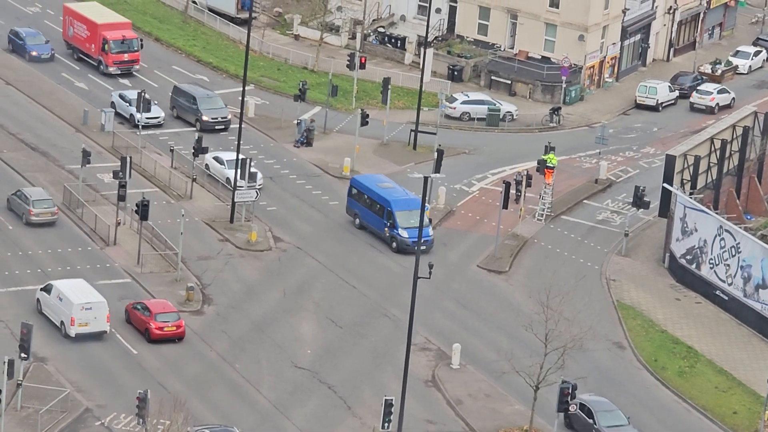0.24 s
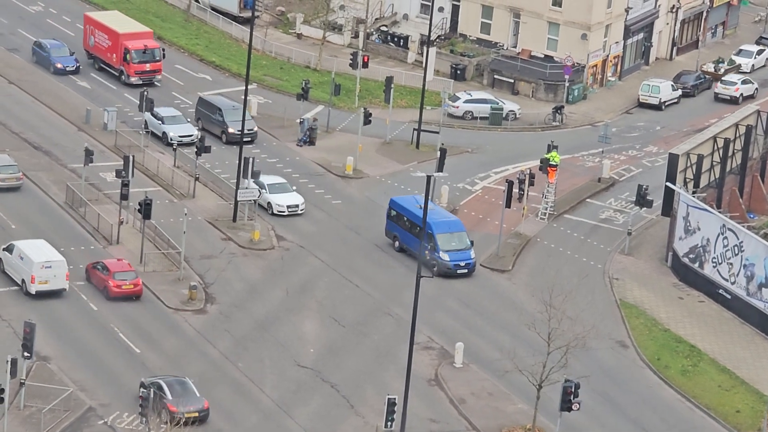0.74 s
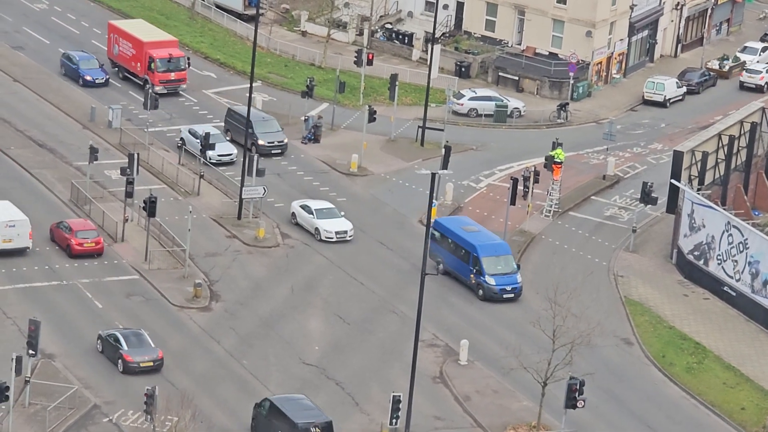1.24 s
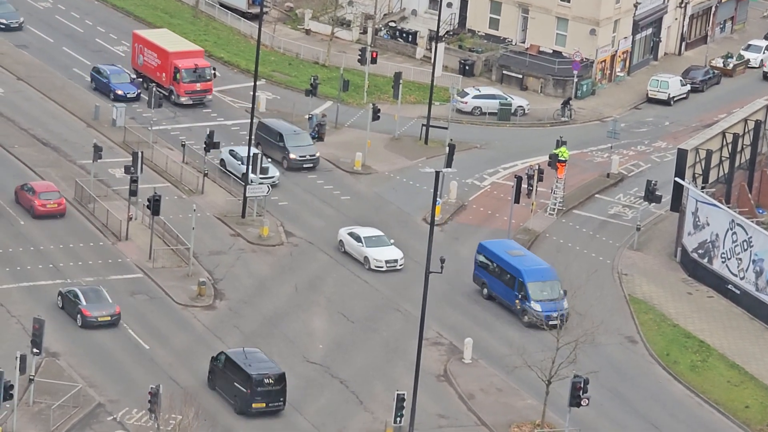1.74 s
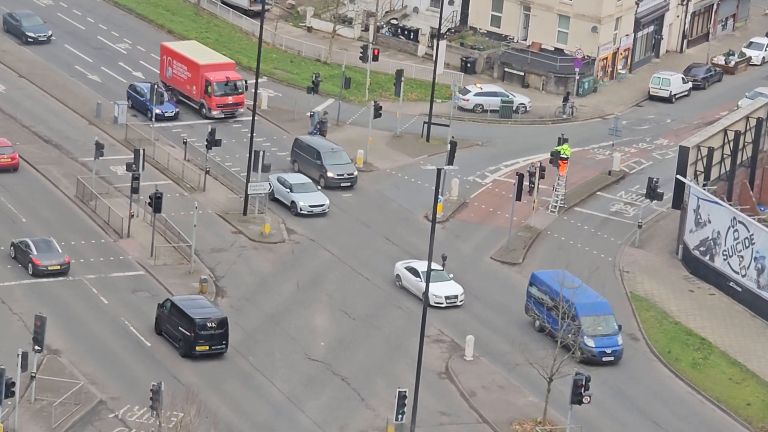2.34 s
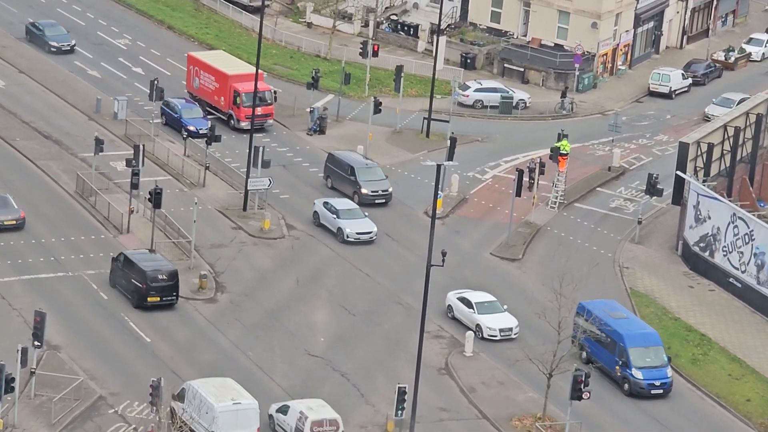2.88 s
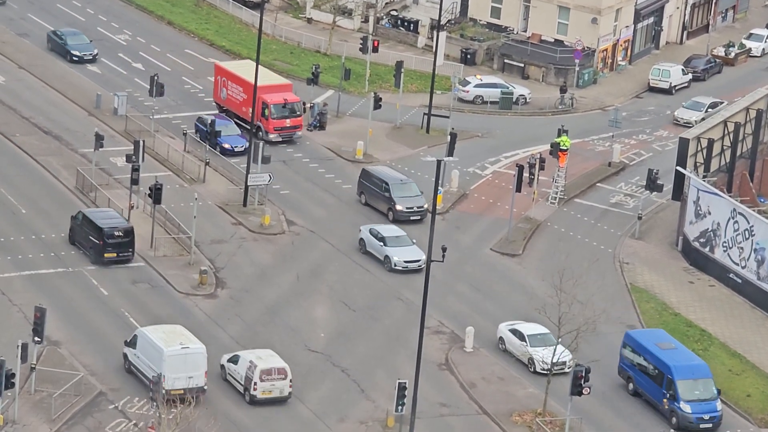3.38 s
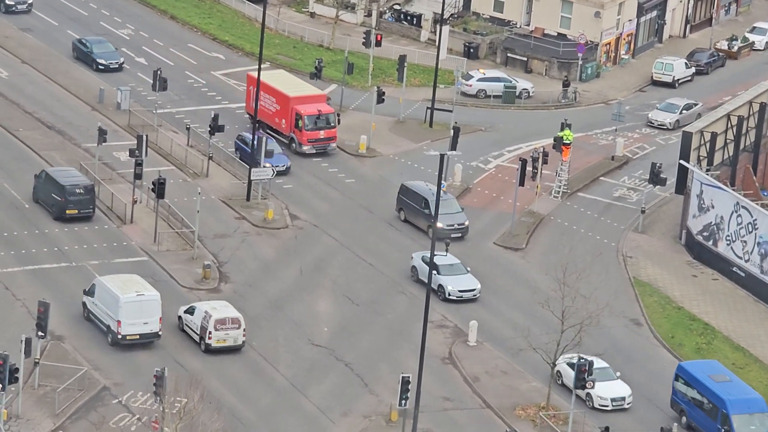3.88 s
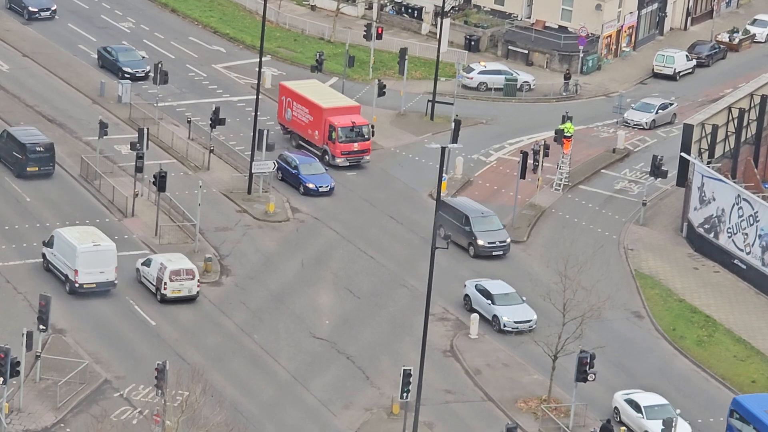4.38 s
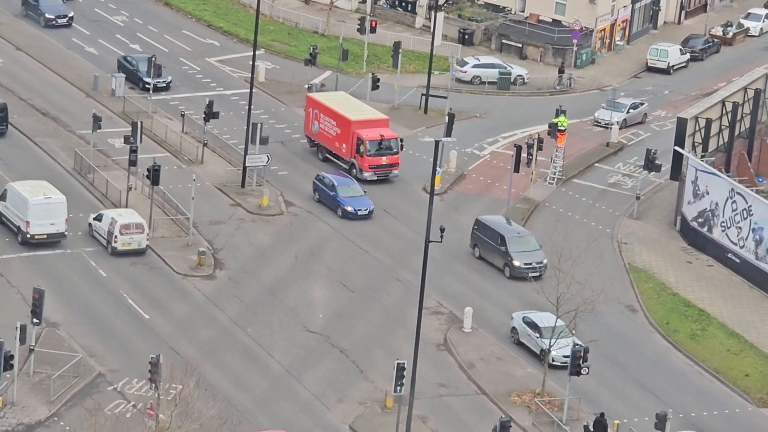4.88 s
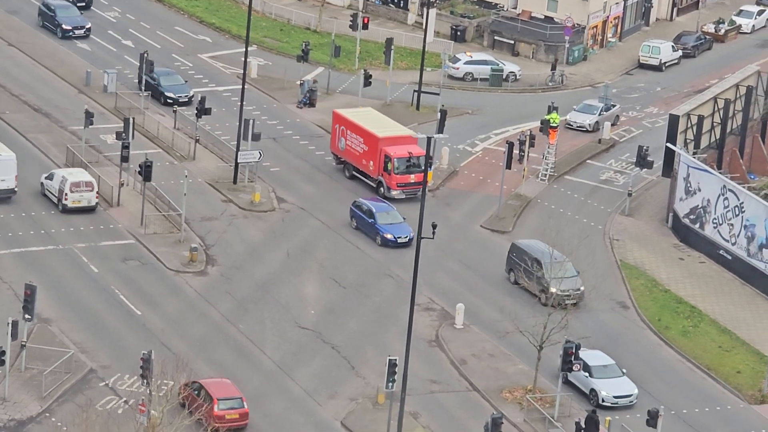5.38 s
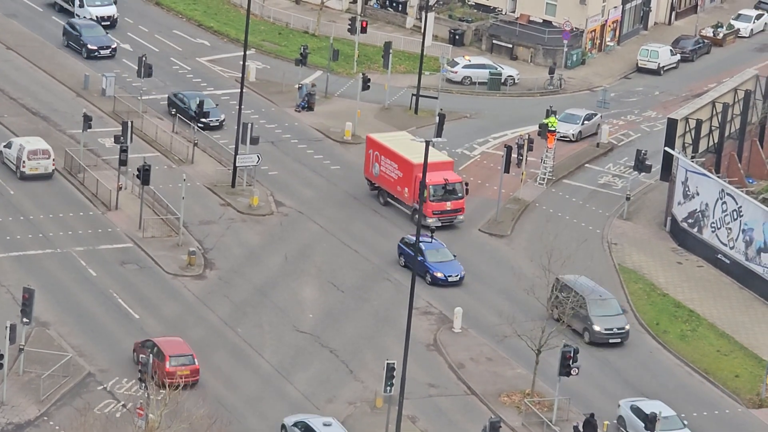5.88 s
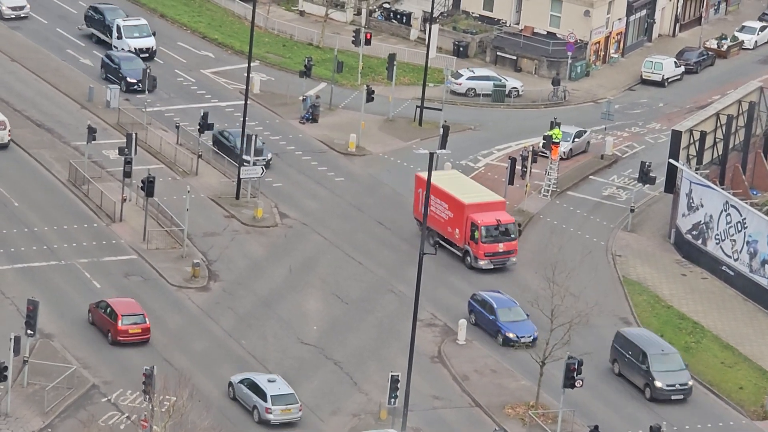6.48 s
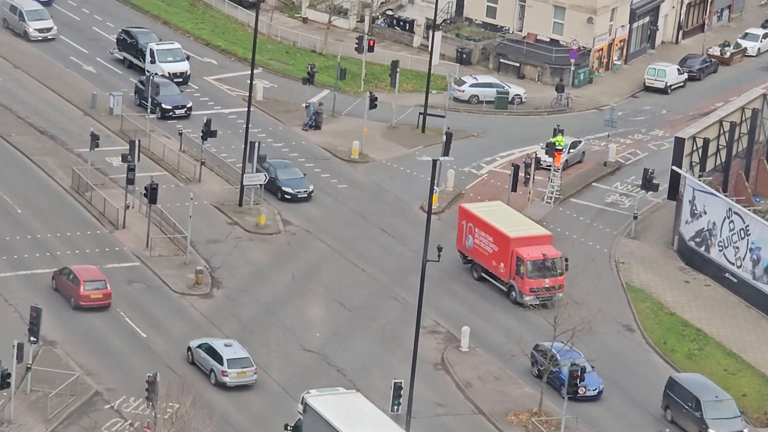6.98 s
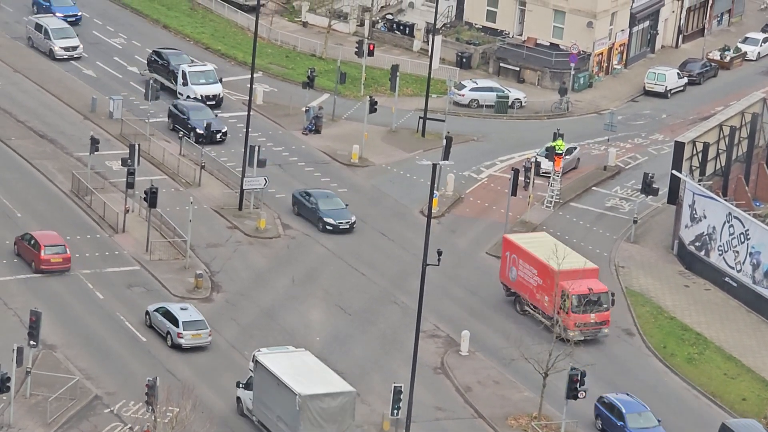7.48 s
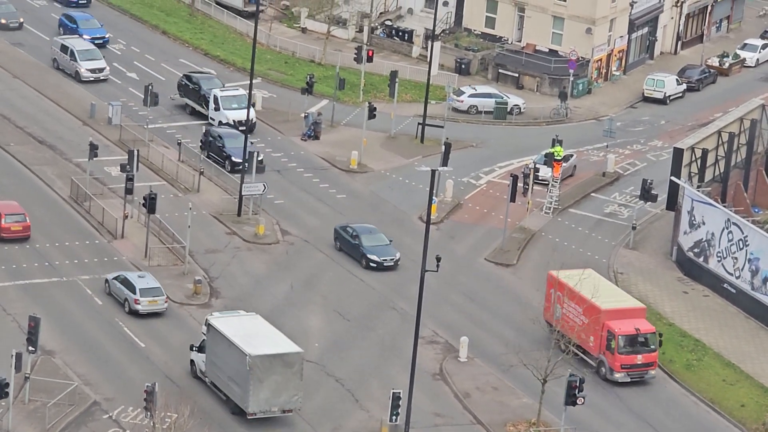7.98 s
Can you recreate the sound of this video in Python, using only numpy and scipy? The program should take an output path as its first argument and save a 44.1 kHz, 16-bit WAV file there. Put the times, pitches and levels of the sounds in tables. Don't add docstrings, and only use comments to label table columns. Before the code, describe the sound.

From the start, a busy junction is heard through a closed window from a high room: deep exhaust rumble, a low drone and muffled tyre roar striped by pane resonances. Short throttle throbs around 50 to 70 Hz come and go, swelling strongest from about 2.8 to 5 s, while fainter engines glide beneath. The roar gradually comes nearer, fullest near 7 s. Light wheel knocks fall at 4.4 and 4.65 s, followed by a barely audible gear squeal. From 5.2 to 6.6 s a lorry pulls away, its low note rising steadily. Sharp dry ticks in the room stand out at 6.4 and 6.6 s, with much fainter ones elsewhere. At 7.4 s wheels hit a drain cover with a hard, booming thump and click; another soft squeal follows. A faint high knock comes at 8.1 s, then a tiny tick. Slight cloth rustles and phone hiss remain very quiet.

```python
import sys
import numpy as np
from scipy import signal
from scipy.fft import rfft, irfft, next_fast_len
from scipy.io import wavfile
from scipy.ndimage import uniform_filter1d

SR = 44100
rng = np.random.default_rng(int(sys.argv[2]) if len(sys.argv) > 2 else 0)


def volts_from_decibels(level):
    exponent = np.asarray(level, float) / 20
    return 10 ** exponent


def generate_wav(sig):
    pcm = np.round(np.clip(np.atleast_2d(sig).T, -1, 1) * 32767).astype(np.int16)
    wavfile.write(sys.argv[1], SR, pcm)


N = 362943
SIZE = next_fast_len(N)
HZ = np.maximum(np.arange(SIZE // 2 + 1) * SR / SIZE, 1)
TIME = np.arange(N) / SR
BRIEF = np.arange(2 ** 15) / SR

# time in seconds, engine load in dB, nearness in dB.
TRAFFIC = [(0, 3.5, -4.5), (.5, -7, -3.5), (.9, 1.5, -2.5), (1.5, -0.5, -1.5), (1.8, 2.5, -1),
           (2.4, -1.5, 0.5), (2.9, 0, -1), (3.35, 2, 0.5), (3.7, 1.5, 2.5), (4.3, 4.5, 0.5), (5.1, -3, 0.5),
           (5.6, 2, 1), (6.2, 2, 1), (6.65, -5.5, 1.5), (7.0, 3, 2), (7.4, 1, 0), (7.9, -1, -1),
           (8.23, 5, 0)]
# frequency in Hz, level in dB per Hz.
RUMBLE_COLOUR = [(11, -40.5), (18, -9.5), (43, 7), (59, 4.5), (75, 5.5), (110, -11.5), (140, -41),
                 (240, -120)]
DRONE_COLOUR = [(59, -34.5), (100, 0), (134, -2), (183, -7.5), (266, -2.5), (283, -3), (312, -24),
                (330, -33.5), (430, -51.5), (730, -120)]
ROAR_COLOUR = [(180, -38), (310, -12), (333, -12), (404, -4.5), (533, 0.5), (555, -1), (600, -7.5),
               (814, -7.5), (895, -13.5), (920, -14.5), (1200, -48.5), (2020, -120)]
TYRE_COLOUR = [(520, -35.5), (880, -8), (904, -19), (994, 1.5), (1180, -9), (1250, -11), (1380, -9),
               (1520, -9.5), (1800, -14.5), (2180, -16), (2380, -23), (3030, -26), (4030, -36.5),
               (6000, -57.5)]
RUMBLE_DB, DRONE_DB, ROAR_DB, TYRE_DB = -38.5, -42.5, -45, -49.5
DRONE_PER_NEAR, TYRE_PER_NEAR = 0.47, 0.28
# centre in Hz, width in Hz, lift in dB.
PANES = [(156.4, 2.9, 3.5), (234.6, 4.9, 6), (541, 13, 3.5), (687, 5.6, 10), (954.5, 17, 10),
         (1361, 120, 6.5), (1930, 56, 3), (2174, 16, 7), (2540, 60, 5.5), (2794, 65, 6.5), (3066, 28, 8),
         (3320, 75, 4), (4360, 71, 8), (2710, 52, -8.5), (3800, 170, -4), (5400, 36, 4.5)]

# time in seconds, firing rate in Hz, level in dB.
LORRY = [(5.2, 63.05, -46.5), (5.33, 65.05, -31.5), (5.45, 67.24, -30.5), (5.65, 71.1, -34.5),
         (5.75, 73.55, -28.5), (5.88, 76.34, -34), (6.05, 77.97, -32.5), (6.45, 84.7, -34), (6.6, 84, -51)]
# multiple, level in dB.
FIRING_ORDERS = [(1, 0)]
LORRY_UPPER_ORDERS = [(4 / 3, -12), (2, -12)]
PULL_ORDERS = [(1, -1.5), (2, -30)]
FULL_REVS_HZ, UPPER_DB_PER_HZ = 82, 0.9
# peak in seconds, length in seconds, firing rate in Hz, glide in Hz per second,
# peak level in dB.
JABS = [(0.039, .12, 55.9, -1.5, -31.5), (.2, .14, 49.35, 3, -31.5), (.67, .14, 57.7, 3, -32.5),
        (0.902, .12, 58.1, 0.5, -35), (1.263, .16, 64.9, 9.5, -30.5), (1.538, .14, 51.8, -1.5, -33),
        (1.793, .12, 47.6, -1, -29), (2.25, .16, 47.6, 0, -32), (2.368, .12, 67.5, -19.5, -34),
        (2.619, .14, 54.7, -0.5, -32), (2.794, .14, 58.7, 8.5, -28), (2.975, .18, 61.7, 19, -26.5),
        (3.209, .28, 68.1, 0, -25), (3.837, .16, 62.6, -6.5, -24), (4.4, .2, 46.64, -0.5, -29.5),
        (4.741, .12, 50.4, 20.5, -29), (4.877, .12, 50.3, 0, -25), (4.982, .1, 47.6, -28, -28),
        (5.204, .09, 62.8, -1, -33), (6.564, .12, 64.9, 2.5, -34.5), (6.755, .14, 63.8, -0.5, -35),
        (7.052, .24, 67.85, -79, -27), (7.649, .1, 47.8, 0, -31), (8.106, .12, 79, -3, -31.5)]
JAB_EDGE_DB, JAB_SHOULDER_DB = -22, -10.5
# start in seconds, length in seconds, first Hz, last Hz, level in dB.
PULLS = [(.1, 0.5, 48.55, 53.7, -39.5), (1.1, .8, 62.86, 92.7, -43), (1.85, .6, 94.2, 68.6, -44.5),
         (1.42, 0.57, 52.4, 53.35, -39), (3.4, .3, 70.5, 78.1, -38.5), (4.202, .45, 43.7, 46.6, -38.5),
         (7.3, 0.62, 48.66, 47.7, -37.5), (7.9, 0.36, 45, 46.3, -36), (.5, 0.37, 128.5, 132.4, -45),
         (1.02, 0.34, 124, 127.3, -40.5), (1.4, .68, 125.8, 130, -41), (2.15, .35, 126, 127.7, -44),
         (2.55, .5, 128.3, 124, -45.5), (3.3, .65, 127.8, 129, -42), (4.15, .2, 134.5, 140.6, -44.5),
         (4.5, .25, 133, 136.2, -43), (4.75, 0.41, 132, 131.3, -42.5), (5.05, .45, 131.3, 129.7, -46.5),
         (2.999, .7, 89.5, 93.7, -44.5), (5.5, 0.2, 135.2, 134.2, -49), (6.7, 0.66, 119.6, 120.4, -49),
         (7.5, .8, 117.9, 129.9, -47.5), (7.75, .2, 84.9, 83, -36.5)]
PULL_ATTACK_S, PULL_RELEASE_S, PULL_EDGE_DB = 0.08, 0.09, -14

# start in seconds, pitch in Hz, level in dB,
# rise in seconds, 60 dB decay in seconds.
THUMPS = [
    (7.397, 533, -23, 0.0021, 0.1),
    (7.397, 272, -24.5, 0.0063, 0.16),
    (7.394, 1600, -41, 0.0011, 0.024),
    (4.4, 810, -33, 0.00056, 0.045),
    (4.652, 1700, -38, .006, .11),
    (4.652, 1600, -45, .006, .12),
    (4.655, 2170, -48, .006, .11),
    (4.645, 3400, -62, .006, .15),
    (8.128, 3000, -52.5, 0.0014, 0.063),
]
# start in seconds, length in seconds, centre in Hz, level in dB.
WHINE = [
    (4.75, .7, 3070, -70),
    (7.25, .74, 3040, -71),
]

# start in seconds, ring in dB, ring in Hz, bright edge in dB, left minus right in dB.
TICKS = [
    (3.1937, -70, 4500, -90, -3),
    (3.371, -62, 5220, -79, -8),
    (5.215, -67, 4440, -82, 4),
    (6.397, -43, 2990, -83, 2),
    (6.5913, -40, 3700, -57, 3),
    (8.1766, -72, 4700, -63.5, -1),
]
# multiple of the ring, level in dB, 60 dB decay in seconds.
TICK_MODES = [(.66, 1, 0.0069), (1, 0, .013), (1.35, -14.5, .01)]
SNAP_MULTIPLE, SNAP_DB, SNAP_T60_S = 2.57, 9, 0.0076
# start in seconds, length in seconds, dull part
# in dB, bright part in dB, bright centre in Hz.
PUFFS = [(0.381, 0.051, -76.5, -84.5, 7500), (1.381, 0.068, -80, -89, 7405),
         (2.493, 0.057, -77, -78, 7420), (3.365, 0.11, -80, -85.5, 6000), (4.366, .08, -81, -92, 6956),
         (4.65, 0.046, -77.5, -82.5, 10200), (5.38, 0.076, -81.5, -93, 8200),
         (6.391, 0.032, -71, -82.5, 5920), (7.393, 0.09, -79.5, -94, 8570),
         (7.494, 0.034, -89, -86.5, 12450), (8.163, 0.084, -76, -85, 7300)]

# frequency in Hz, correlation from 0 to 1.
PORT_LIKENESS = [(60, 0.95), (150, 0.96), (250, 0.96), (325, 0.63), (400, .93), (560, 0.81), (640, 0.42),
                 (1000, 0.35), (1300, 0.15), (4000, 0.17), (6000, .2)]
# frequency in Hz, phase in radians.
LEFT_LEAD = [(20, -.36), (65, -.25), (130, -.12), (220, .05), (320, -.5), (400, .25), (600, .1), (1030, .6),
             (1250, 2.4), (1640, 2.6), (2240, 1.2), (3450, 1.2), (4500, 0)]
LEFT_DB = 1.42
# frequency in Hz, level in dB per Hz.
HISS_COLOUR = [(3500, -10.5), (4800, 2), (5800, 2), (7200, 1), (8300, -4.5), (9400, -7), (10300, -10),
               (11000, -7), (11400, 0), (12500, -3), (14000, -3.5), (15700, -1)]
HISS_DB = -86.5


def on_hz(table):
    hz, value = np.transpose(table)
    return np.interp(np.log(HZ), np.log(hz), value)


def unit(x):
    return x / np.sqrt(np.mean(x ** 2))


def walk(rate, size=N):
    hold = int(SR / rate)
    held = np.repeat(rng.standard_normal(size // hold + 1), hold)[:size]
    return 1.333 * uniform_filter1d(uniform_filter1d(held, hold), hold)


def add(out, start, sound):
    i = int(start * SR)
    out[..., i:i + sound.shape[-1]] += sound[..., :N - i]


def ports(mid, side):
    alike = np.clip(on_hz(PORT_LIKENESS), 0, 0.998)
    mid = mid * np.sqrt(1 + alike)
    side = side * np.sqrt(1 - alike)
    left = (mid + side) * np.exp(1j * on_hz(LEFT_LEAD))
    return np.array([left, mid - side]) / np.sqrt(2)


def wash(colour, flicker_db, rate, count):
    pane_db = sum(db / (1 + (2 * (HZ - hz) / width) ** 2) for hz, width, db in PANES)
    inside = (HZ > colour[0][0]) & (HZ < colour[-1][0])
    noise = rfft(rng.standard_normal((2, SIZE)))
    both = ports(*noise * volts_from_decibels(on_hz(colour) + pane_db) * inside)
    low_hz, high_hz = colour[1][0], colour[-2][0]
    place = np.clip(count * np.log(HZ / low_hz) / np.log(high_hz / low_hz), 0, count)
    out = 0
    for k in range(count + 1):
        share = np.clip(1 - abs(place - k), 0, 1)
        out = out + irfft(both * share, SIZE)[:, :N] * volts_from_decibels(flicker_db * walk(rate))
    return unit(out)


def traffic():
    s, *controls = np.transpose(TRAFFIC)
    load_db, near_db = (np.interp(TIME, s, db) for db in controls)
    rumble = volts_from_decibels(RUMBLE_DB + load_db) * wash(RUMBLE_COLOUR, 0.61, 4.5, count=3)
    drone = volts_from_decibels(DRONE_DB + DRONE_PER_NEAR * near_db) * wash(DRONE_COLOUR, 0.9, 6, count=3)
    roar = volts_from_decibels(ROAR_DB + near_db) * wash(ROAR_COLOUR, 1.5, 9, count=3)
    tread = volts_from_decibels(TYRE_DB + TYRE_PER_NEAR * near_db) * wash(TYRE_COLOUR, 1.0, 14, count=5)
    return rumble + drone + roar + tread


def engine(table, orders, wander=0.006, shake_db=0.2):
    s, hz, db = np.transpose(table)
    t = np.arange(max(s[0], 0), s[-1], 1 / SR)
    fade = np.clip(np.minimum(t - t[0], s[-1] - t) / 0.036, 0, 1)

    def waver(rate):
        return walk(rate, size=2 ** 17)[:len(t)]

    firing_hz = np.interp(t, s, hz) * (1 + wander * waver(16))
    turn = 2 * np.pi * np.cumsum(firing_hz) / SR
    tone = sum(volts_from_decibels(g + shake_db * waver(8.7)) * np.sin(k * turn + 7 * rng.random()) for k, g in orders)
    out = np.zeros(N)
    add(out, t[0], np.sqrt(2) * fade * volts_from_decibels(np.interp(t, s, db)) * tone)
    return out


def lorry():
    upper = [(s, hz, db + UPPER_DB_PER_HZ * min(hz - FULL_REVS_HZ, 0)) for s, hz, db in LORRY]
    firing = engine(LORRY, FIRING_ORDERS, wander=0.004, shake_db=1.5)
    return firing + engine(upper, LORRY_UPPER_ORDERS, wander=0.0045, shake_db=3)


def jab(s, length, hz, glide, db):
    times = length * np.linspace(-1, 1, 5) * 0.75
    shape_db = np.array([JAB_EDGE_DB, JAB_SHOULDER_DB, 0, JAB_SHOULDER_DB, JAB_EDGE_DB])
    return np.transpose([s + times, hz + glide * times, db + shape_db])


def pull(s, length, first_hz, last_hz, db):
    attack = min(PULL_ATTACK_S, length / 3)
    release = min(PULL_RELEASE_S, length / 3)
    times = np.array([0, attack, length - release, length])
    glide_hz = first_hz + (last_hz - first_hz) * times / length
    return np.transpose([s + times, glide_hz, db + PULL_EDGE_DB * np.array([1, 0, 0, 1])])


def engines():
    tones = lorry() + sum(engine(jab(*row), FIRING_ORDERS) for row in JABS)
    tones = tones + sum(engine(pull(*row), PULL_ORDERS, shake_db=2) for row in PULLS)
    single = rfft(tones, SIZE)
    return irfft(ports(single, single * 1j), SIZE)[:, :N]


def swell(t, rise, t60):
    return (1 - np.exp(-t / max(rise, 1e-4))) ** 2 * np.exp(-np.log(1000) * t / t60)


def thumps():
    out = np.zeros(N)
    for s, hz, db, rise, t60 in THUMPS:
        ring = np.sin(2 * np.pi * hz * BRIEF * (1 - BRIEF / 20))
        add(out, s, volts_from_decibels(db) * swell(BRIEF, rise, t60) * ring)
    return out


def grit(hz, spread):
    octaves = np.log2((1 + np.arange(len(BRIEF) // 2 + 1)) * SR / len(BRIEF) / hz)
    noise = rfft(rng.standard_normal((2, len(BRIEF))))
    return unit(irfft(noise * np.exp(-(octaves / spread) ** 2)))


def whine():
    out = np.zeros((2, N))
    for s, length, hz, db in WHINE:
        arch = np.sin(np.pi * np.clip(BRIEF / length, 0, 1))
        add(out, s, volts_from_decibels(db) * arch * grit(hz, spread=0.04))
    return out


def ticks():
    out = np.zeros((2, N))
    for s, db, hz, bright_db, pan_db in TICKS:
        pan = volts_from_decibels(np.array([[pan_db], [-pan_db]]) / 2)
        ring = 0
        for k, g, t60 in TICK_MODES:
            mode = np.sin(2 * np.pi * k * hz * BRIEF + 7 * rng.random((2, 1)))
            ring = ring + volts_from_decibels(g) * swell(BRIEF, 0.00018, t60) * mode
        body = volts_from_decibels(db - 3.5) * pan * grit(hz, 0.6)
        edge = volts_from_decibels(bright_db + np.array([[-1], [1]])) * (grit(11000, 0.76) + 0.7 * grit(11500, 0.05))
        snap = swell(BRIEF, 0.00033, SNAP_T60_S) * np.sin(2 * np.pi * SNAP_MULTIPLE * hz * BRIEF)
        snap = volts_from_decibels(bright_db + SNAP_DB + np.array([[-6], [2]])) * snap
        crack = (body + edge) * swell(BRIEF, 0.0002, 0.014)
        tail = (volts_from_decibels(db - 26) * grit(hz, 0.4) + volts_from_decibels(-16) * edge) * swell(BRIEF, 0.0036, 0.26)
        add(out, s, volts_from_decibels(db) * pan * ring + snap + crack + tail)
    return out


def puffs():
    out = np.zeros((2, N))
    for s, length, dull_db, bright_db, hz in PUFFS:
        puff = np.clip(np.minimum(BRIEF / 0.01, 1.2 * (1 - BRIEF / (1.6 * length))), 0, 1)
        dull = volts_from_decibels(dull_db) * (grit(4300, 0.3) + 5.5 * grit(2600, 0.57))
        bright = volts_from_decibels(bright_db + np.array([[-2.5], [1.5]])) * grit(hz, 0.6)
        add(out, s, puff * (dull + bright))
    return out * volts_from_decibels(1.5 * walk(160))


def scene():
    street = traffic() + engines() + thumps() + whine()
    room = ticks() + puffs()
    return street * volts_from_decibels(np.array([[LEFT_DB], [-LEFT_DB]]) / 2) + room


def roll_off(x):
    return signal.sosfilt(signal.butter(12, 15720, fs=SR, output="sos"), x)


def record(dry):
    noise = rfft(rng.standard_normal((2, SIZE)))
    hiss = unit(irfft(noise * volts_from_decibels(on_hz(HISS_COLOUR)) * (HZ > 3500), SIZE)[:, :N])
    return roll_off(dry + volts_from_decibels(HISS_DB) * hiss)


dry = scene()
out = record(dry)
generate_wav(out)
```